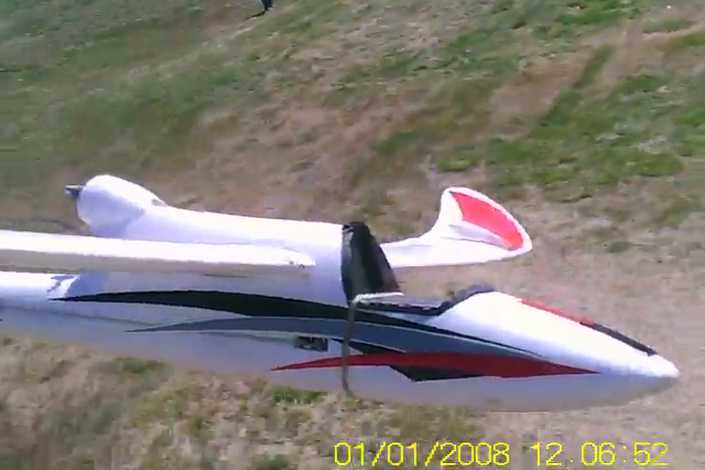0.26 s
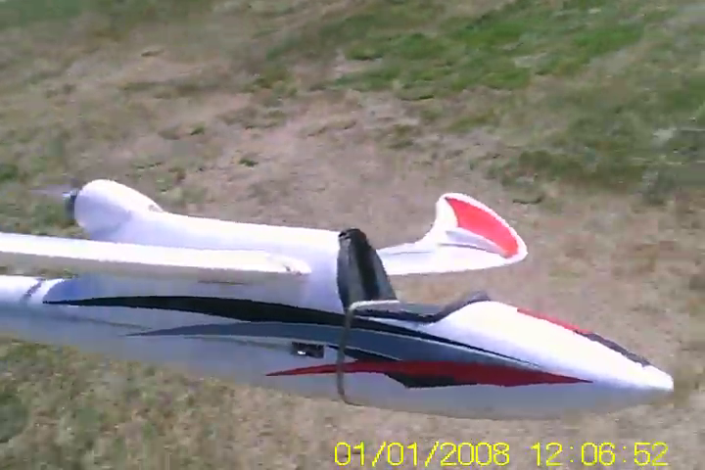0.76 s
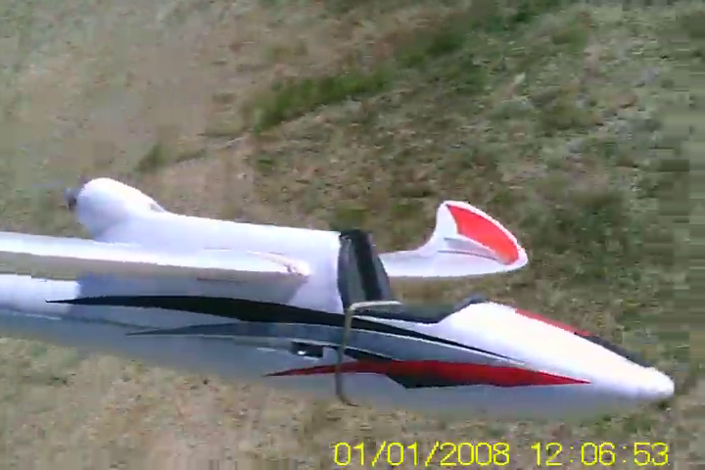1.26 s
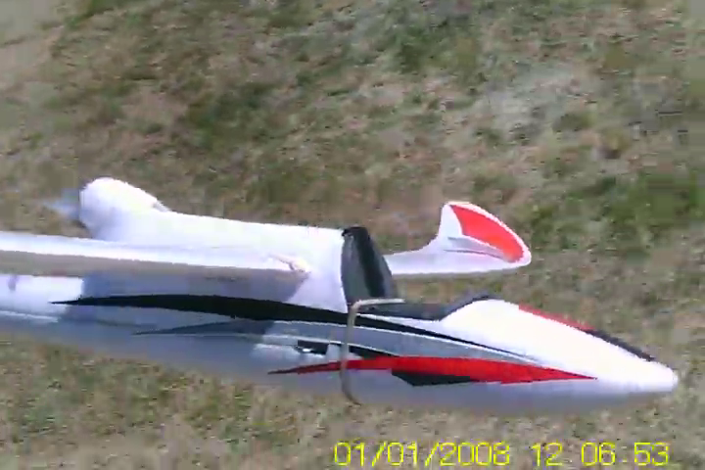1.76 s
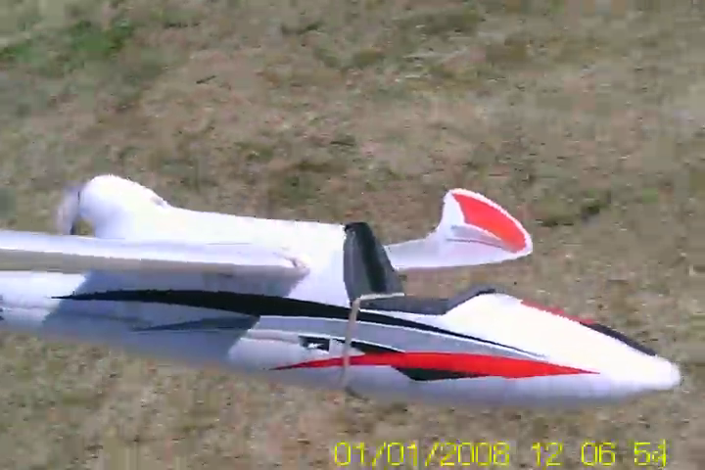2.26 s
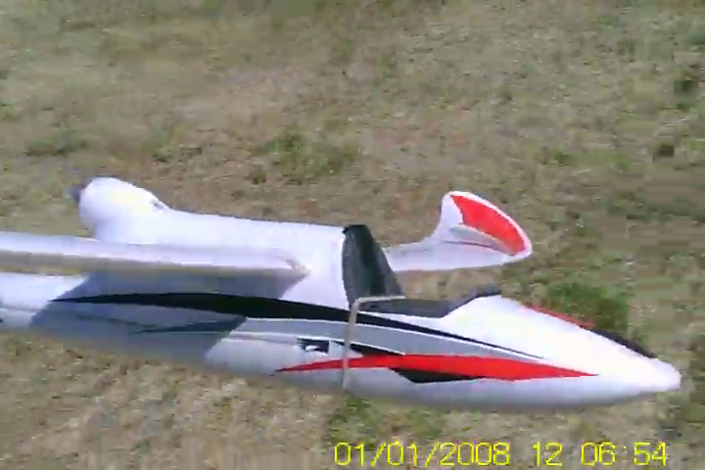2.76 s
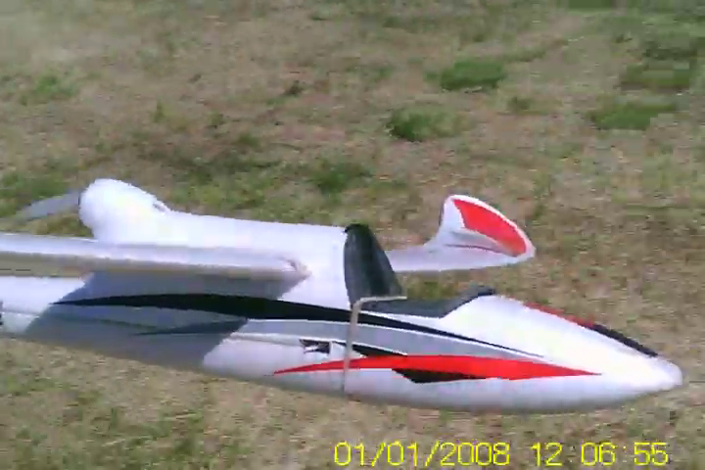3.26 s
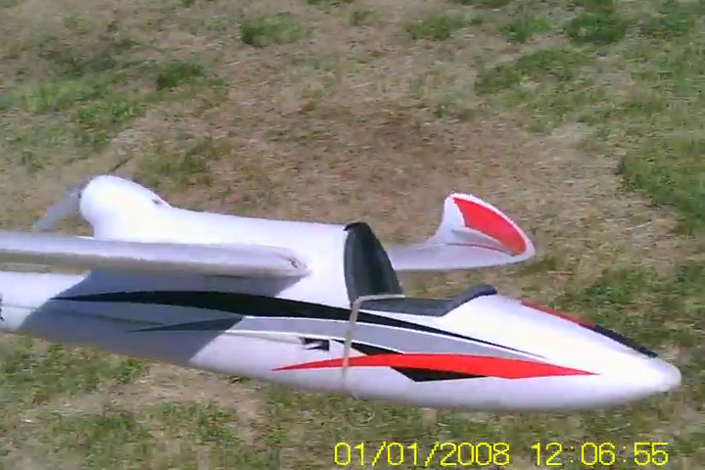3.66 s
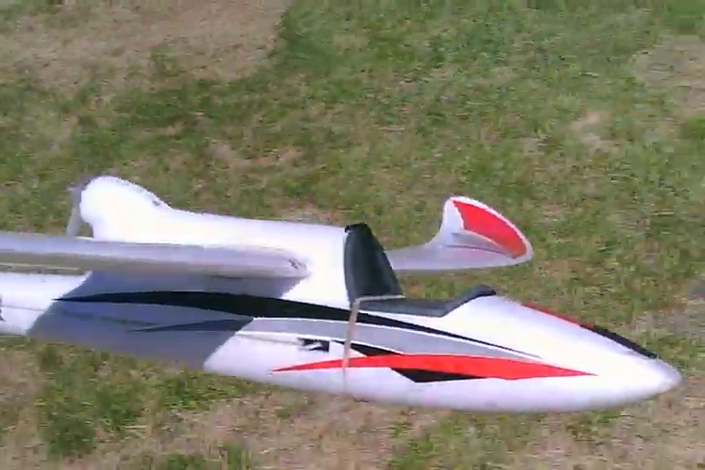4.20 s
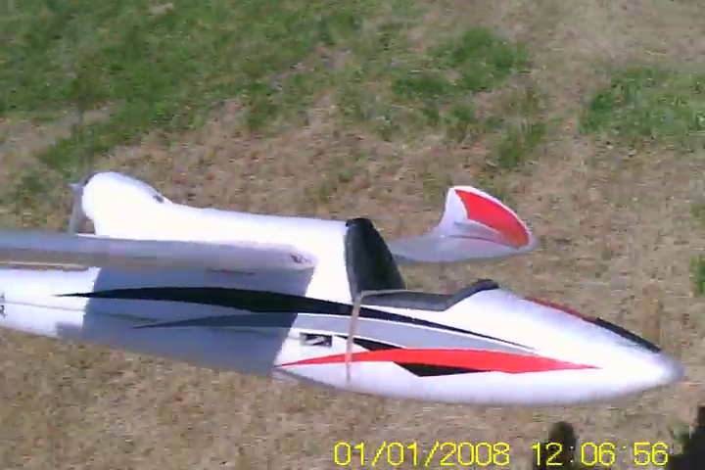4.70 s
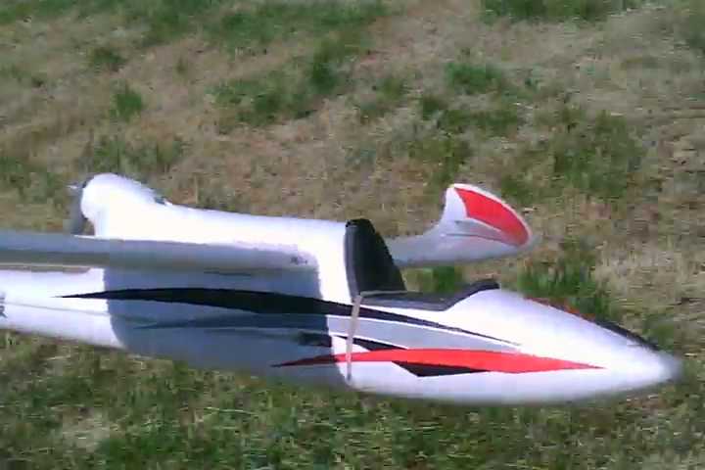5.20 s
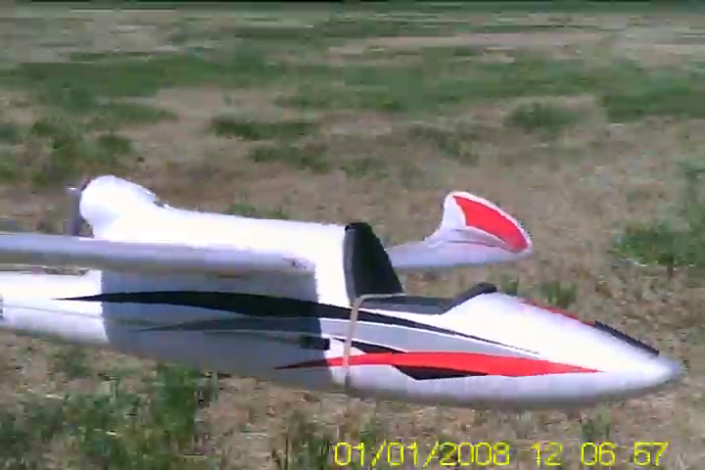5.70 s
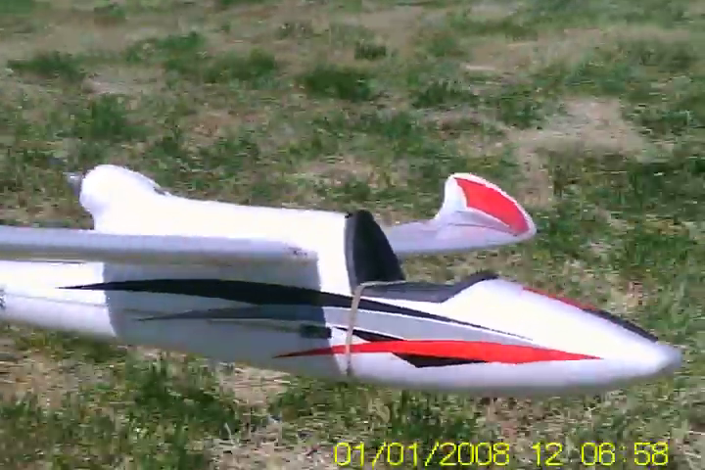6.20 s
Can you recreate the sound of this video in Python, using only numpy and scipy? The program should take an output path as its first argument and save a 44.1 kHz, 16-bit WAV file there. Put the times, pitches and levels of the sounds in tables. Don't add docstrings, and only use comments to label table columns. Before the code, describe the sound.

Wind rumbles and rushes over a small microphone on a gliding model plane; its electric motor whines, a gust thumps, then the motor winds down.

```python
import sys
import numpy as np
from scipy import signal
from scipy.fft import rfft, irfft, next_fast_len
from scipy.io import wavfile
from scipy.ndimage import uniform_filter1d, map_coordinates

SR = 44100
rng = np.random.default_rng(int(sys.argv[2]) if len(sys.argv) > 2 else 0)


def attenuation_scalar(level_db):
    decades = np.asarray(level_db, float) / 20
    return 10 ** decades


def wrap_up_sound(samples):
    columns = np.atleast_2d(samples).T
    tamed = np.clip(columns, -1, 1)
    steps = np.round(tamed * 32767).astype(np.int16)
    wavfile.write(sys.argv[1], SR, steps)


N = 284445
T = np.arange(N) / SR
SLOW = np.arange(0, N, 32) / SR

# (time [s], peak level [dB], rise [s])
GUST_STEPS = [
    (.7622, -5, .0016),
    (.7245, -10, .0035),
    (.8, -13, .005),
]


def unit(x):
    return x / np.sqrt(np.mean(x ** 2) + 1e-20)


def curves(rows, off=None):
    s, *cols = np.transpose(rows)
    return [np.interp(T, s, c, off, off) for c in cols]


def wobble(rate):
    return map_coordinates(rng.standard_normal(int(N * rate / SR) + 4), [T * rate])


def filtered(x, response):
    m = next_fast_len(N + 8192)
    return irfft(rfft(x, m) * response(np.fft.rfftfreq(m, 1 / SR)), m)[:N]


def modes(table):
    def response(f):
        total = 0
        for k, (centre, width, db) in enumerate(table):
            damping = 1j * f * width
            total = total + (-1) ** k * attenuation_scalar(db) * damping / (centre * centre - f * f + damping)
        return total
    return response


def noise(spectrum, patchy_db, lumps=1):
    z = signal.stft(rng.standard_normal(N + 512), nperseg=512)[2]
    field = uniform_filter1d(uniform_filter1d(rng.standard_normal(z.shape), 6, 0), 8, 1)
    x = signal.istft(z * attenuation_scalar(patchy_db * unit(field)), nperseg=512)[1][:N]
    f, db = np.transpose(spectrum)
    log_f = np.log(f + 1)
    return unit(filtered(x * lumps, lambda hz: attenuation_scalar(np.interp(np.log(hz + 1), log_f, db, -120, -120))))


def tone(hz):
    return np.sqrt(2) * np.sin(2 * np.pi * np.cumsum(hz) / SR + 7 * rng.random())


def shaken(table, hz):
    swept = hz[::32]
    power = sum(attenuation_scalar(db) ** 2 / (1 + (2 * (swept - c) / w) ** 2) ** 2 for c, w, db in table)
    return np.interp(T, SLOW, np.sqrt(power))


def speed(rows):
    s, hz = np.transpose(rows)
    return np.exp(np.interp(T, s, np.log(hz), -50, -50)) / 36


def gain_control():
    after = np.maximum(T - 0.778, 0)
    dip_db = -5.5 * np.exp(-after / 0.05)
    return attenuation_scalar(uniform_filter1d(np.where(after > 0, dip_db, 5), size=600))


def wind():
    # (time [s], level [dB])
    airstream = [(0, -28.5), (.14, -25), (.25, -25.5), (.32, -25), (.5, -23), (.74, -22), (.82, -14),
                 (.88, -23.5), (1.6, -25), (2.1, -25), (2.3, -23), (3.3, -22.5), (3.8, -28), (4.5, -23.5),
                 (4.7, -27.5), (5.15, -25), (6.2, -23.5), (6.45, -30)]
    # (time [s], level [dB])
    small_eddies = [(0, -56.5), (.195, -49.5), (.23, -47.5), (.5, -41.5), (.75, -45.5), (1.0, -42),
                    (1.15, -47), (1.4, -43.5), (1.98, -42), (2.2, -43.5), (2.25, -49), (2.85, -49),
                    (3.3, -54.5), (3.7, -58.5), (4.4, -58.5), (5.0, -60), (5.6, -60), (6.2, -61.5)]
    # (middle [s], length [s], level relative to the turbulence [dB])
    puffs = [(0.313, 0.045, -7), (1.1, 0.046, -1), (3.858, .025, -3), (4.28, 0.044, 2), (4.83, .06, -5.5),
             (3.062, 0.061, -0.5), (3.135, 0.018, 0), (3.693, 0.031, 2), (3.808, .09, 8), (3.914, 0.054, 7),
             (4.03, 0.15, 8.5), (4.4, .1, 4), (4.477, 0.031, 0), (4.587, 0.041, 8.5), (4.658, .02, 4),
             (4.72, 0.16, 7), (4.996, 0.07, 3), (5.25, 0.037, 3), (5.77, .05, 4), (6.234, 0.035, 7),
             (6.322, 0.024, 8), (6.385, 0.073, 9.5), (6.455, 0.025, 22)]
    # (start, peak, hold to, end [s], driven, peak, held level [dB])
    windmill = (1.893, 1.96, 2.22, 2.24, 11, 16.4, 11)
    # (time [s], smooth share of hiss, blown share of rush)
    wash_cover = [(2.15, .99, .98), (2.3, .98, 0.73), (3.3, .97, 0.57), (4.7, 0.97, 0.43),
                  (4.9, 0.95, 0.35), (6.15, 0.47, 0.14), (6.25, 0.99, 0.91)]
    # (frequency [Hz], density [dB per Hz])
    buffet = [(7.1, -21), (12, 1), (86, -4), (125, -8), (252, -16), (302, -20), (367, -20.5), (600, -30),
              (780, -39.5), (1320, -120)]
    # (frequency [Hz], density [dB per Hz])
    blown_rush = [(150, -22.5), (250, -4), (411, -4.5), (497, -7), (560, -7), (894, -9.5), (1720, -9),
                  (2700, -22.5), (3510, -50), (5940, -120)]
    # (frequency [Hz], density [dB per Hz])
    open_rush = [(150, -33.5), (250, -4), (370, -7), (600, -7.5), (850, -10), (1100, -13), (1500, -14.5),
                 (1950, -13.5), (2200, -23), (2500, -41.5), (3500, -72.5)]
    # (frequency [Hz], density [dB per Hz])
    hiss = [(1290, -8), (2200, 0), (2440, 0), (2670, -4), (3600, -9.5), (4620, -13.5), (5180, -27.5),
            (5600, -26), (7280, -46.5), (12300, -120)]
    # (frequency [Hz], density [dB per Hz])
    crackle = [(2000, -41), (2500, 1.5), (3400, 0), (4700, -2.5), (5500, -11.5), (6500, -22.5),
               (8000, -56.5)]
    # (frequency [Hz], density [dB per Hz])
    spray = [(2880, -33.5), (4900, -1), (5360, -12.5), (6110, -2), (6980, -4.5), (8400, -19), (9000, -23.5),
             (11700, -57.5), (19800, -120)]
    # (frequency [Hz], density [dB per Hz])
    whisper = [(7400, -62), (7900, -2), (9000, -2), (10200, 2), (11000, -7), (12200, -28.5), (12600, -56)]

    air_db, eddy_db = curves(airstream)[0], curves(small_eddies)[0]
    puff_db = sum(db * np.exp(-(2 * (SLOW - s) / length) ** 4) for s, length, db in puffs)
    puff_db = np.interp(T, SLOW, puff_db)
    rough_db = eddy_db + 60
    hiss_db = eddy_db + puff_db
    rush_db = -38.5 + 0.32 * rough_db + 0.35 * puff_db + 0.09 * (air_db + 25)
    *brake_s, driven_db, peak_db, held_db = windmill
    brake_db = np.interp(T, brake_s, [driven_db, peak_db, held_db, 0])
    fine_db = -84.5 + 0.81 * rough_db + 1.35 * puff_db + brake_db
    gust, eddy = wobble(14), wobble(130)

    low = noise(buffet, patchy_db=-0.18)
    low = unit(low / np.abs(uniform_filter1d(low ** 2, size=3000)) ** 0.12)
    for s, *_ in GUST_STEPS:
        low *= 1 - .6 * np.exp(-((T - s - .003) / .008) ** 2)

    wash, blown = np.clip(curves(wash_cover), 0, 1)
    free = np.sqrt(1 - wash ** 2)
    lumps = attenuation_scalar(0.63 * eddy)
    inside = blown * noise(blown_rush, 0.47, lumps)
    outside = np.sqrt(1 - blown ** 2) * noise(open_rush, 0.99, lumps)
    mid = attenuation_scalar(rush_db + 0.42 * gust) * (inside + outside)

    smooth = noise(hiss, patchy_db=0.0, lumps=attenuation_scalar(1.1 * eddy + 0.92 * wobble(400)))
    pops = (rng.random(N) < 170 / SR) * attenuation_scalar(3.5 * rng.standard_normal(N))
    bursts = noise(crackle, patchy_db=1.5, lumps=uniform_filter1d(pops, size=50) * 50 + 0.45)
    high = attenuation_scalar(hiss_db + 0.56 * gust) * (wash * smooth + free * bursts)

    fine = attenuation_scalar(fine_db + 2.2 * gust) * noise(spray, patchy_db=1.5, lumps=attenuation_scalar(2.1 * eddy))
    tips = attenuation_scalar(hiss_db - 31) * (T < 2.22) * noise(whisper, patchy_db=2.5)
    heave = attenuation_scalar(1.1 * wobble(18))
    return attenuation_scalar(air_db) * heave * low + mid + high + fine + tips


def motor():
    # (time [s], frequency [Hz])
    driven = [(0, 5650), (.02, 6240), (.05, 6752), (.1, 7023), (.22, 7364), (.7, 7680), (1.3, 7100),
              (1.75, 7090), (1.82, 6940)]
    # (time [s], frequency [Hz])
    coasting = [(1.89, 6500), (1.95, 5570), (2.019, 4340), (2.12, 3230), (2.27, 2290), (2.52, 1607),
                (2.8, 1153), (3.1, 793.6), (3.42, 464)]
    # (time [s], frequency [Hz])
    spinup = [(6.21, 560), (6.229, 1000), (6.246, 1580), (6.262, 2010), (6.3, 2880), (6.34, 3974),
              (6.38, 5360), (6.4, 5960), (6.449, 6730)]
    # (frequency [Hz], width [Hz], level [dB])
    magnets = [(600, 80, -41), (719, 60, -32), (850, 110, -38), (970, 120, -31.5), (1060, 100, -28.5),
               (1170, 80, -41), (1256, 110, -35), (1366, 120, -34), (1620, 150, -34.5), (2000, 300, -41),
               (2500, 500, -52), (4500, 750, -49.5), (7050, 650, -69), (7600, 400, -75)]
    # (frequency [Hz], width [Hz], level [dB])
    poles = [(962, 110, -37.5), (1032.4, 90, -36), (4600, 700, -59.5)]
    # (frequency [Hz], width [Hz], level [dB])
    teeth = [(1830, 200, -44.5), (2145, 190, -41.5), (2450, 300, -47.5), (2830, 260, -52), (3300, 300, -64)]
    # (order, level [dB])
    slots = [(72, -50), (81, -53), (99, -49)]
    # (frequency [Hz], width [Hz], level [dB])
    frame = [(2300, 560, 0)]
    # (frequency [Hz], width [Hz], level [dB])
    smeared = [(800, 200, -39), (1030, 240, -33), (1580, 420, -34), (2350, 500, -48), (3400, 900, -58),
               (4650, 1000, -49), (6200, 900, -70)]
    # (frequency [Hz], width [Hz], level [dB])
    low_order = [(1010, 170, -40), (1600, 450, -49)]
    # (time [s], level [dB])
    bearing = [
        [(0, -61.5), (.5, -55), (.77, -56.5), (1.3, -57), (1.9, -68), (2.2, -57), (2.42, -68), (2.7, -57.5),
         (3, -78)],
        [(6.2, -82), (6.24, -59), (6.3, -61), (6.34, -66), (6.39, -55), (6.45, -56)],
    ]
    # (frequency [Hz], width [Hz], level [dB])
    shell = [(4580, 650, 0)]
    # (time [s], level [dB], ring frequency [Hz], time to fall by 20 dB [s])
    jolts = [
        (6.222, -32.5, 1000, .05),
        (6.238, -35, 1600, .04),
        (6.226, -37.5, 2100, .045),
        (6.332, -39, 1000, .09),
    ]

    shaft = speed(driven + coasting) * (1 + .0012 * wobble(60))
    flutter = attenuation_scalar(1.3 * wobble(70) + 2.5 * (T < 1.9) * wobble(22))
    out = shaken(magnets, 36 * shaft) * flutter * (tone(36 * shaft) + attenuation_scalar(-9) * tone(37 * shaft))
    heard = np.abs(T - 1.2) > 1.05
    out += shaken(poles, 27 * shaft) * heard * attenuation_scalar(1.5 * wobble(40)) * tone(27 * shaft)
    pair = tone(109 * shaft) + attenuation_scalar(-7 + 3 * wobble(30)) * tone(106 * shaft)
    out += shaken(teeth, 108 * shaft) * attenuation_scalar(1 + 4 * wobble(28)) * pair
    for order, db in slots:
        mount = np.abs(modes(frame)(order * shaft)) ** 2
        out += (T > 2.67) * attenuation_scalar(db + 2.5 * wobble(31.84)) * mount * tone(order * shaft)

    again = speed(spinup)
    whine = 36 * again
    rough_whine = tone(whine * (1 + .011 * wobble(300)))
    out += (again > 1) * shaken(smeared, whine) * attenuation_scalar(1.6 * wobble(110)) * rough_whine
    out += shaken(low_order, whine / 4) * attenuation_scalar(2.5 * wobble(90)) * tone(9 * again)

    hum = unit(filtered(rng.standard_normal(N), lambda f: modes(shell)(f) ** 2))
    bearing_db = np.maximum(*(curves(rows, -120)[0] for rows in bearing))
    out += attenuation_scalar(bearing_db - 0.5) * hum

    t = np.arange(SR // 10) / SR
    for s, db, ring_hz, t20 in jolts:
        band = signal.butter(3, [0.9 * ring_hz, 1.12 * ring_hz], "band", fs=SR)
        shake = unit(signal.lfilter(*band, rng.standard_normal(len(t))))
        out[round(s * SR):][:len(t)] += attenuation_scalar(db - 60 * t / t20 / 3) * (1 - np.exp(-t / 0.003)) * shake
    return out + rattle(np.cumsum(shaft + again) / SR)


def electronics():
    # (frequency [Hz], density [dB per Hz])
    circuit_hiss = [(2940, -34), (5000, -9), (5790, -14.5), (6490, -14.5), (7160, -7.5), (7950, -11),
                    (9930, -10), (11500, -24), (15000, -57.5), (22000, -120)]
    # (on [s], off [s], first level [dB], last level [dB])
    switching = [
        (0, 1.92, -66, -71),
        (6.16, 6.5, -70, -68),
        (6.218, 6.46, -64, -57.5),
    ]
    # (frequency [Hz], level [dB])
    leaks = [(5599, -82), (7402, -84.5), (9598, -89)]

    out = attenuation_scalar(-79 + 3.0) * noise(circuit_hiss, patchy_db=0.7)
    for on, off, first_db, last_db in switching:
        db = np.interp(T, [on, off], [first_db, last_db], -120, -120)
        out += gain_control() * attenuation_scalar(db + 0.72 * wobble(30)) * tone(np.full(N, 8011))
    for hz, db in leaks:
        out += attenuation_scalar(db + 1.5 * wobble(120)) * tone(hz + 8 * wobble(90))
    return out


def rattle(turns):
    # (start [s], length [s], tick level [dB], ping over tick [dB])
    spells = [(.08, 0.077, -59.5, -16), (0.206, 0.096, -55.5, -14.5), (0.332, 0.12, -55.5, -9),
              (.47, 0.088, -54, -10), (0.599, 0.036, -70, -9), (.65, 0.072, -54, -9.5),
              (.76, 0.013, -53, -17), (0.804, 0.027, -50.5, -13), (.885, .045, -57, -10),
              (0.951, .05, -60, -10), (1.028, 0.046, -57.5, -11.5), (1.163, .06, -60.5, -10),
              (1.27, 0.16, -55.5, -13.5), (1.484, .016, -62, -10), (1.521, 0.072, -57, -11.5),
              (1.66, .09, -58.5, -9.5), (1.849, .03, -70, -10), (1.943, .06, -56.5, -11.5),
              (2.099, .03, -60, -8), (6.31, .016, -66, -12), (6.362, .05, -59, -13), (6.44, .03, -67, -9)]
    # (frequency [Hz], width [Hz], level [dB])
    tick_modes = [(3090, 940, -3.5), (4830, 550, -2.5), (5730, 800, -1.5), (6400, 710, -0.5),
                  (7180, 790, -2)]
    # (frequency [Hz], width [Hz], level [dB])
    ping_modes = [(9600, 650, 0), (10400, 900, -20)]

    at = np.flatnonzero(np.diff(np.floor(turns)))
    chance = rng.standard_normal((len(at), 3))
    at = np.clip(at + (7 * chance[:, 0]).astype(int), 0, N - 1)
    tick_levels, ping_levels = [], []
    for s, length, db, over in spells:
        outside_s = np.maximum(0, np.maximum(s - SLOW, SLOW - s - length))
        spell_db = db - 900 * outside_s
        tick_levels.append(spell_db)
        ping_levels.append(spell_db + over)
    tick_db, ping_db = np.max(tick_levels, axis=0), np.max(ping_levels, axis=0)
    tick_size = chance[:, 1]
    ping_size = 0.25 * chance[:, 1] + 0.4 * chance[:, 2]
    out = 0
    for db, table, size in ((tick_db + 4.0, tick_modes, tick_size), (ping_db + .1, ping_modes, ping_size)):
        blows = np.zeros(N)
        blows[at] = attenuation_scalar(1.8 * size)
        blows = uniform_filter1d(blows, size=5) * (1.6 + rng.standard_normal(N))
        ring = filtered(blows, lambda f: modes(table)(f) ** 2)
        out = out + np.interp(T, SLOW, attenuation_scalar(db)) * ring / np.std(ring[:2 * SR])
    return out


def gusts():
    # (time [s], level [dB])
    snaps = [(3.4316, -44), (3.4696, -44), (3.7734, -45), (3.8188, -48), (3.8776, -48), (3.95, -45),
             (3.9809, -48), (3.9984, -51), (4.2753, -43), (4.586, -52), (4.6564, -41), (4.9402, -47),
             (5.1233, -42), (5.236, -45), (5.248, -43), (5.3074, -43), (5.459, -41), (5.5079, -39),
             (5.5366, -39), (5.7643, -39), (5.7928, -42), (5.8561, -49), (5.934, -49), (6.0961, -43),
             (6.2118, -51), (6.2238, -48), (6.283, -37), (6.315, -35), (6.3395, -41), (6.356, -42)]

    out, t = np.zeros(N + SR), np.arange(SR // 8) / SR
    for s, db, rise in GUST_STEPS:
        step = t / rise * np.exp(1 - t / rise) * (1 - t / rise / 5)
        out[round(s * SR):][:len(t)] -= attenuation_scalar(db) * step
    foam = attenuation_scalar(-14 - 60 * t / 0.14) * np.sin(2 * np.pi * 195 * t)
    out[round(GUST_STEPS[0][0] * SR):][:len(t)] -= foam
    band = signal.butter(3, [2300, 5300], "band", fs=SR)
    for s, db in snaps:
        puff = rng.standard_normal(len(t)) * attenuation_scalar(-60 * t / 0.0082) * (1 - np.exp(-t / 0.00082))
        out[round(s * SR):][:len(t)] += attenuation_scalar(db + 5.5) * signal.lfilter(*band, puff)
    return out[:N]


def scene():
    return (gain_control() * (wind() + motor()) + gusts() + electronics())[None]


def top_cut(x):
    return signal.sosfilt(signal.butter(12, 12400, fs=SR, output="sos"), x)


def record(dry):
    return top_cut(dry - attenuation_scalar(-41.7))


dry = scene()
out = record(dry)
wrap_up_sound(out)
```